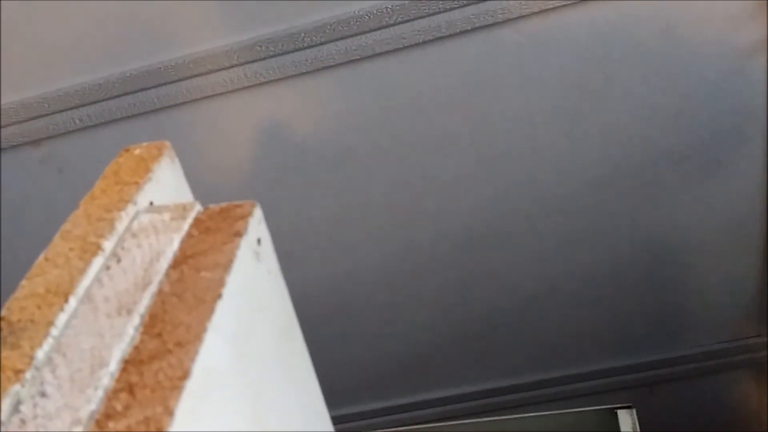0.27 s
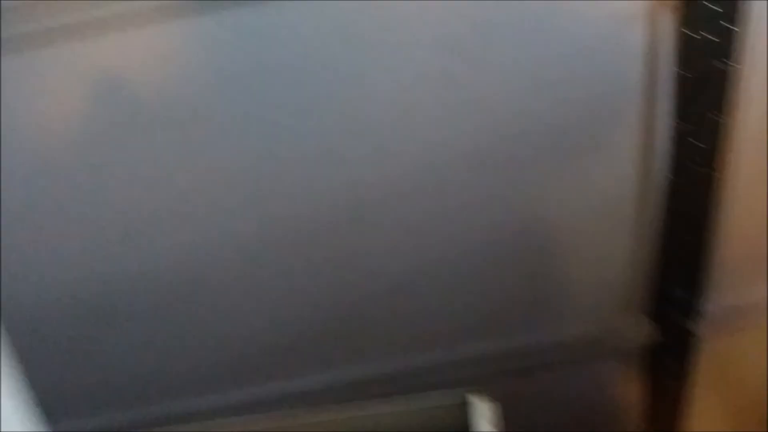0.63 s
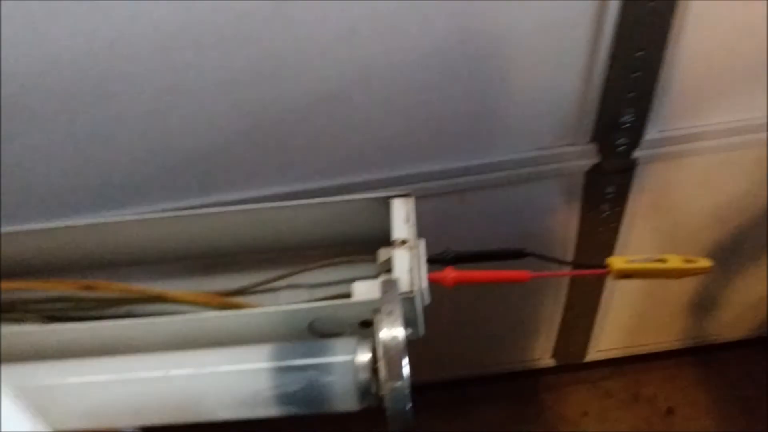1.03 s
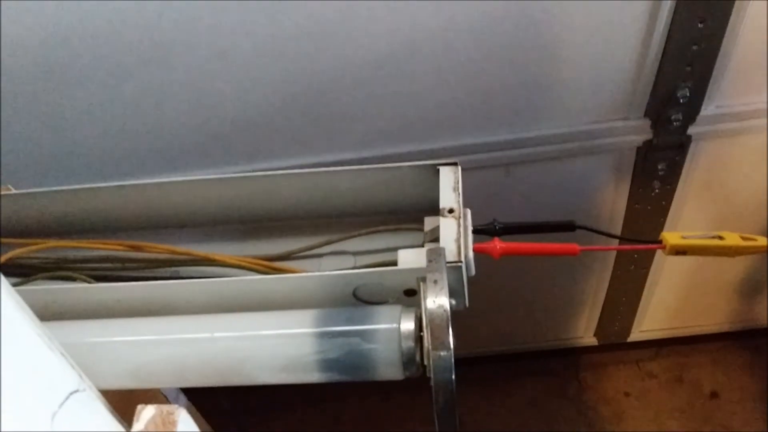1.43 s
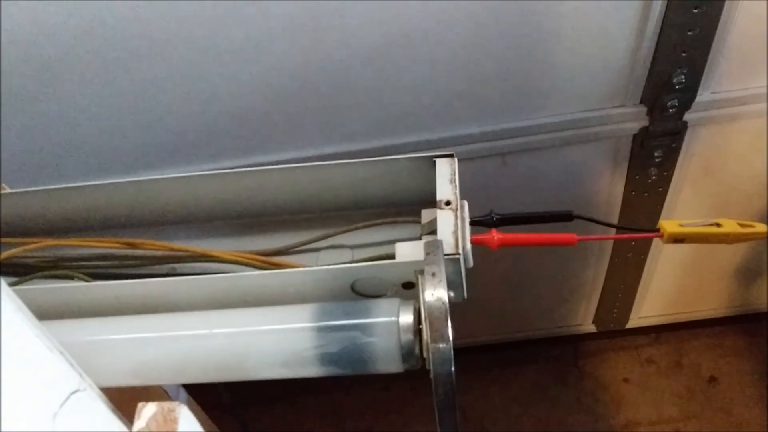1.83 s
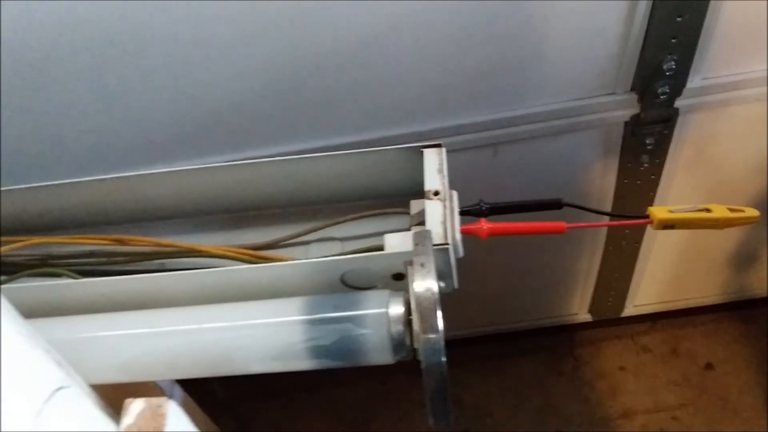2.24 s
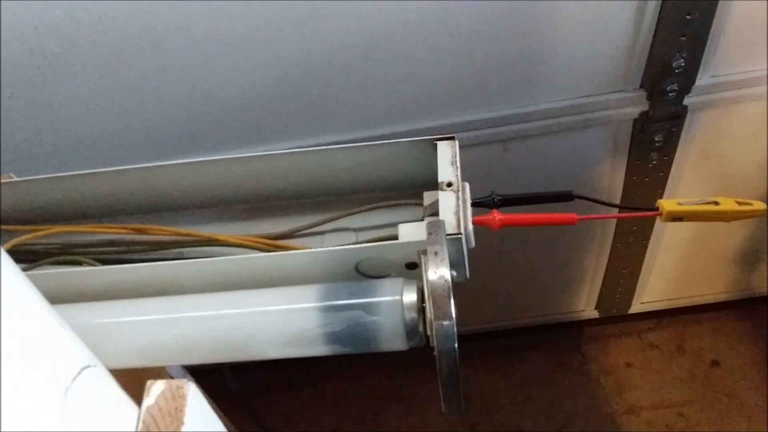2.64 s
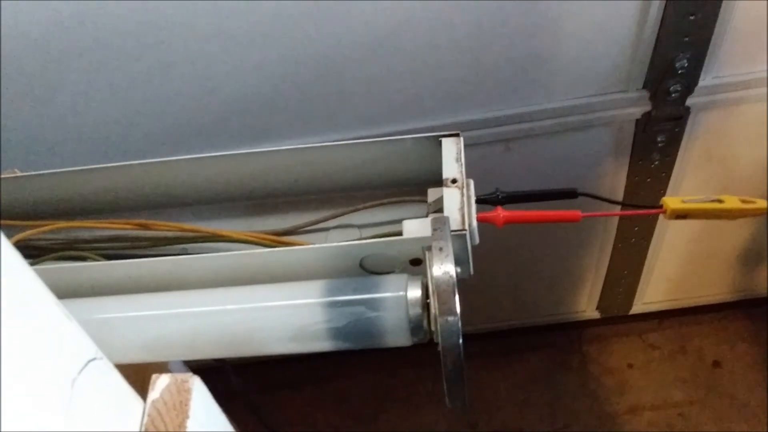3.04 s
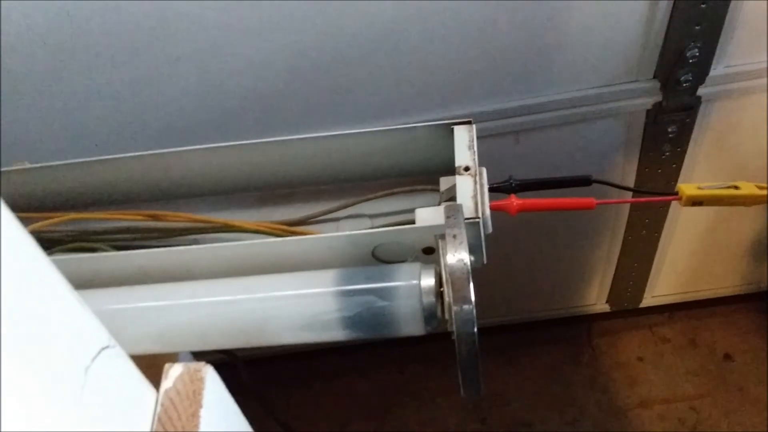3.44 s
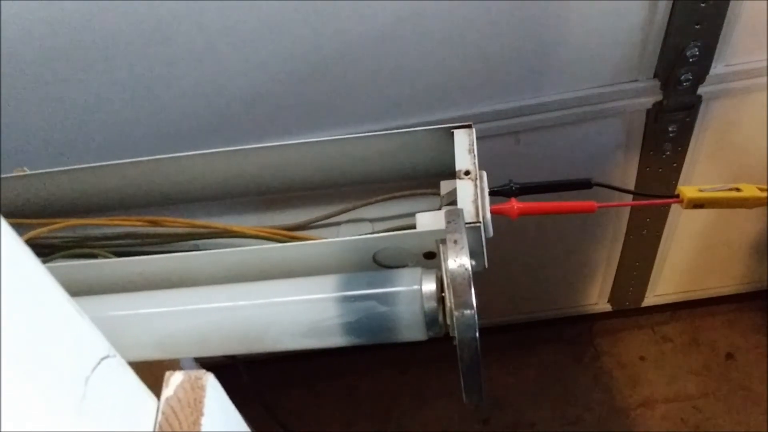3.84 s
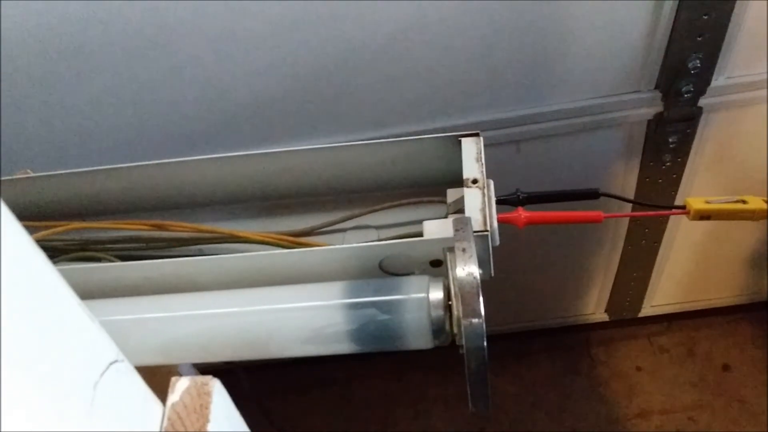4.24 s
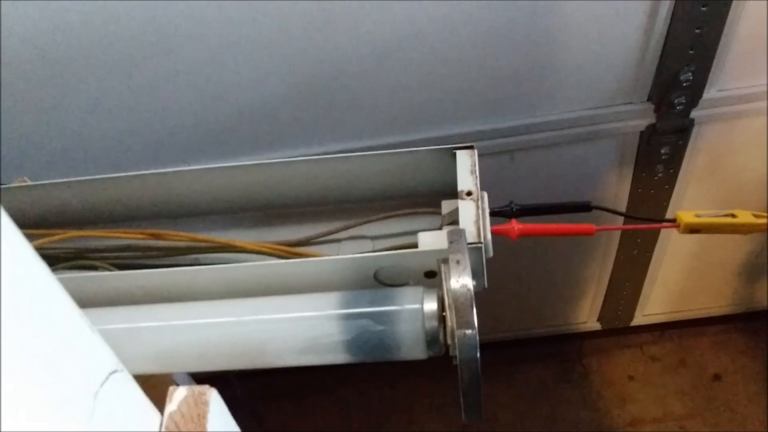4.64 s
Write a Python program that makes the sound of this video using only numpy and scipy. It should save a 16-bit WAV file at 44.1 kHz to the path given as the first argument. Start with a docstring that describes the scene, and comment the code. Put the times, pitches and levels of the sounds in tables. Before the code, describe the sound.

A fluorescent tube tries to start with uneven, high glassy tinks and dry ticks, over light handling noise and a faint hum.

```python
"""A fluorescent tube trying to start

A cold tube in a quiet garage tinks at uneven moments, each impulse ringing its glass near 9 kHz.
Between the tinks come dry ticks and the friction noise of handling: rustle, scuffs and soft bumps.
One knock excites the modes of the sheet-metal fitting. A faint hum and the room's air lie beneath."""
import sys
import numpy as np
from scipy import signal
from scipy.fft import rfft, irfft, next_fast_len
from scipy.io import wavfile
from scipy.ndimage import map_coordinates

SR = 44100
rng = np.random.default_rng(int(sys.argv[2]) if len(sys.argv) > 2 else 0)


def generate_wav(signal):
    """Clip the signal to [-1, 1] and save it as 16-bit WAV at the path in sys.argv[1]."""
    frames = np.transpose(np.atleast_2d(signal))
    scaled = np.clip(frames, -1, 1) * 32767
    pcm = np.round(scaled).astype(np.int16)
    wavfile.write(sys.argv[1], SR, pcm)


N = 215843

# brushing contacts: t/s, scuff level/dB, bump level/dB, t60/s
CONTACT_EVENTS = [(0.1118, -48, -55, 0.15), (0.7448, -41.5, -46, 0.047), (1.074, -47, -65, 0.075),
                  (1.212, -48, -68, 0.2), (1.5153, -45.5, -44.5, 0.17), (1.88, -46, -62, 0.067),
                  (2.8506, -53, -66, 0.16), (3.2143, -52.5, -61, 0.42), (3.9978, -40, -47.5, 0.065),
                  (4.0235, -40.5, -47.5, 0.072), (4.115, -44.5, -44.5, 0.063), (4.249, -56, -52, .15),
                  (4.738, -65, -50, 0.087)]
# spectrum of rustling friction: f/Hz, level/dB
FRICTION_SPECTRUM = [(240, -40), (400, -6.5), (865, -10.5), (949, -11), (1040, -9), (1250, -8),
                     (1460, -8.5), (2220, -6.5), (2670, -8), (3020, -7), (6540, -15.5), (8630, 0),
                     (10100, -10.5), (16000, -22.5)]


def tinks():
    """Free vibration: a short chink leaves one glass mode ringing over its neighbours and overtones."""
    # tinks: t/s, ring level/dB, f/Hz, t60/s, chink level/dB, upper overtone level/dB
    strikes = [(0.064, -11.5, 8820, 0.047, -17, -27), (0.2686, -26.5, 8766, 0.071, -23, -53),
               (0.9425, -34.5, 8770, 0.09, -25.5, -58), (1.084, -31, 9060, 0.07, -29.5, -69),
               (1.229, -37.5, 8870, .12, -35, -77), (1.254, -33, 8790, .024, -31, -81),
               (1.5605, -20, 8726, 0.048, -15, -62), (1.764, -23.5, 9080, .15, -24.5, -58),
               (1.929, -19, 8660, .018, -14, -60), (2.0482, -19, 8900, .045, -21, -56),
               (2.167, -34, 8890, .065, -26.5, -75), (2.3048, -26, 9080, 0.043, -31.5, -72),
               (2.416, -26.5, 8839, 0.15, -29, -60), (2.5494, -47, 8880, .05, -30, -71),
               (2.826, -46, 8690, 0.078, -36, -80), (2.8516, -29, 8688, 0.057, -24.5, -61),
               (2.8898, -37, 8839, 0.09, -28.5, -67), (3.2216, -40, 8690, 0.055, -34.5, -81),
               (3.241, -32.5, 9090, 0.033, -38, -76), (3.2647, -37, 8839, 0.097, -28.5, -72),
               (3.501, -34.5, 8877, .035, -35.5, -85), (4.111, -45, 8800, .08, -44, -56),
               (4.763, -45, 8680, 0.03, -35, -81)]
    # glass modes, from the main ring's neighbours to the top overtones: f/Hz, relative level/dB, t60/s
    near_modes = [(8060, -12, 0.034), (8910, -16.5, 0.029), (8839, -12, 0.099), (9760, -18, 0.039),
                  (10330, -31.5, 0.12), (10600, -45, 0.049)]
    mid_modes = [(10250, -19, 0.064), (11120, 1, 0.08), (11650, -2, 0.089), (11800, -5, 0.07),
                 (12900, 6, .09), (11600, -1, 0.12)]
    high_modes = [(13616, -14, .12), (13946, 0, .11)]
    top_modes = [(15360, -13, .12), (15560, -1, .14)]
    # resonances of the chink: f/Hz, width/Hz, relative level/dB
    chink_bands = [(3140, 250, -19), (5880, 3500, -25.5), (8780, 610, -1), (12600, 1400, -28)]
    near_spread, mid_spread = .012, .03  # scatter from tink to tink, as fractions of the frequency
    out, t = np.zeros(N), np.arange(SR // 4) / SR
    for s, ring_db, hz, t60, chink_db, upper_db in strikes:
        near_tuning, mid_tuning = rng.normal(1, [near_spread, mid_spread])
        main = np.sin(2 * np.pi * hz * t) * fade(t, t60)
        neighbours = ring(near_modes, t * near_tuning, scatter_db=3)
        overtones = amp(chink_db - 37) * ring(mid_modes, t * mid_tuning, scatter_db=4)
        overtones += amp(upper_db) * ring(high_modes + top_modes, t, scatter_db=3)
        burst = filtered(rng.standard_normal(len(t)),
                         lambda f: sum(amp(db) * resonance(f, c, w) ** 2 for c, w, db in chink_bands))
        burst *= fade(t, t60=.023)
        chink = amp(chink_db) * burst / np.abs(burst).max()
        add(out, s, (amp(ring_db) * (main + neighbours) + overtones + chink) * rise(t, tau_s=.0008))
    return out


def ticks():
    """Impulse response: a dry snap with a crunch and a hollow ring, then a reflection off the fitting."""
    # distinct ticks: t/s, relative level/dB, treble level/dB
    loud_ticks = [(0.4286, -31, -4.5), (0.482, -16, -9.5), (0.528, -35.5, -8), (0.736, -34.5, -7.5),
                  (0.7502, -35.5, -14), (0.825, -34, -10), (1.3479, -32.5, -7.5), (1.3781, -31.5, -9),
                  (1.4214, -34, -13), (1.4649, -26, -12.5), (1.4842, -32, -9), (1.5588, -30, -3.5),
                  (1.6937, -37.5, -7), (1.7548, -31, -7), (1.8093, -30.5, -3.5), (2.0936, -33, -4),
                  (2.1032, -26.5, -3.5), (2.1446, -32.5, -8), (2.1618, -31, -4.5), (3.817, -48, 10),
                  (4.024, -34, -15), (4.0949, -32.5, -5.5), (4.169, -27.5, -10.5), (4.478, -43.5, -12),
                  (4.7648, -40, -3.5), (4.805, -31.5, 6.5)]
    # spectrum of the snap: f/Hz, level/dB
    snap_spectrum = [(120, -58), (300, -17), (700, -13.5), (1350, -9.5), (2450, 0.5), (3100, -2),
                     (3950, -8), (4700, -5.5), (6900, -8.5), (8600, 1), (10900, -12.5), (15000, -18.5),
                     (16000, -20)]
    # modes that a tick excites: f/Hz, relative level/dB, t60/s
    body_modes = [(2370, 2, 0.014), (2600, -2, 0.015), (2560, -23, 0.0016), (3330, -4, .012)]
    out, t = np.zeros(N), np.arange(2048) / SR
    hz = np.fft.rfftfreq(len(t), 1 / SR)
    treble_shelf = np.clip((hz - 5000) / 4000, 0, 1)
    for s, db, treble_db in loud_ticks + light_ticks():
        crunch = .064 * rng.standard_normal(len(t)) * fade(t, t60=.023)
        slip = (t == 0) + crunch
        pulse = snap(along(snap_spectrum, hz) + treble_shelf * (treble_db + 6.5))
        tick = signal.fftconvolve(slip, pulse / np.linalg.norm(pulse))[:len(t)]
        tick += amp(-33) * ring(body_modes, t, scatter_db=6)
        add(out, s + .001, amp(db + 12.5) * tick)
        add(out, s + rng.uniform(.00384, .00664), amp(db) * tick)  # reflection
    return out


def light_ticks():
    """A jittered pulse train: rows of weak, dull ticks, each at a random point in its time slot."""
    # spells of ticking: start t/s, end t/s, relative level/dB
    spells = [(0.649, 0.86, -41.5), (1.324, 1.53, -40), (1.678, 1.92, -43), (2.059, 2.15, -35)]
    ticks_per_s, scatter_db, treble_db = 46, 4.5, -12
    rows = []
    for start, end, db in spells:
        slots = np.arange(start, end, 1 / ticks_per_s)
        for s, (late, size) in zip(slots, rng.random((32, 2))):
            rows.append((s + late / ticks_per_s, db + scatter_db * (2 * size - 1), treble_db))
    return rows


def knock():
    """Frequency-dependent damping: a clack loses its treble first; the sheet metal's modes follow it."""
    # blow on the fitting: t/s, relative level/dB
    blows = [(1.9283, -22)]
    # modes of the sheet metal: f/Hz, relative level/dB, t60/s
    metal_modes = [(70, -19, 0.13), (190, -13, 0.15), (225, -21, 0.15), (360, -8, 0.12), (450, -12, 0.1),
                   (480, -28, 0.089), (593, -24, 0.13), (710, -17, 0.09), (1370, -8, 0.07),
                   (1980, -11, 0.12), (3900, -11, .07)]
    # spectrum of the clack: f/Hz, level/dB
    clack_spectrum = [(21, -48), (35, -29), (195, -8.5), (634, -14.5), (702, -14), (1060, -15), (1300, -9),
                      (1720, -16.5), (2060, -10.5), (2340, -4.5), (3910, -9.5), (6690, -9), (8650, 9),
                      (10900, -12), (16000, -26)]
    # decay of the clack: f/Hz, t60/s
    clack_decay = [(80, 0.31), (400, 0.34), (1500, 0.1), (4000, 0.04), (12000, 0.035)]
    out, t = np.zeros(N), np.arange(SR // 2) / SR
    for s, db in blows:
        clack = coloured(dying_noise(clack_decay, len(t)), clack_spectrum) * rise(t, tau_s=.0019)
        clack = filtered(clack, lambda hz: bass_cut(hz, corner_hz=350))
        body = ring(metal_modes, t, scatter_db=.5) * rise(t, tau_s=.0011)
        add(out, s - .002, amp(db - 15.7) * clack)
        add(out, s + .008, amp(db - 10) * body)
    return out


def scuffs():
    """Sliding friction: each contact's grainy rub swells and dies, coloured by a hollow resonance."""
    out, t = np.zeros(N), np.arange(SR // 4) / SR
    for s, db, _, t60 in CONTACT_EVENTS:
        grit = rng.standard_normal(len(t))
        grit *= 1 + 3 * (rng.random(len(t)) < .02)  # occasional coarse grains
        grit = filtered(grit, lambda hz: 1 + .48 * resonance(hz, centre_hz=2340, width_hz=530))
        envelope = fade(t, t60) * rise(t, tau_s=.0016)
        add(out, s - .002, amp(db) * coloured(grit, FRICTION_SPECTRUM) * envelope)
    return out


def bumps():
    """Damped impact: the same contacts each give a dull burst of noise with no clear ring."""
    # spectrum of a bump: f/Hz, level/dB
    bump_spectrum = [(60, -18), (130, -2), (220, 4.5), (350, -3.5), (550, -6), (1000, -8), (2000, -18)]
    out, t = np.zeros(N), np.arange(SR // 4) / SR
    for s, _, db, t60 in CONTACT_EVENTS:
        thud = coloured(rng.standard_normal(len(t)), bump_spectrum)
        add(out, s, amp(db) * thud * fade(t, t60) * rise(t, tau_s=.0031))
    return out


def handling():
    """Friction noise: one strength drives a dull rubbing and a rustle that crackles more as it grows."""
    # strength of the handling: t/s, relative level/dB
    strength = [(0.0, -63.5), (0.09, -58.5), (0.3, -55.5), (0.56, -61.5), (1.21, -61.5), (1.37, -60),
                (1.77, -63), (1.97, -57), (2.21, -61.5), (2.4, -62.5), (2.56, -67.5), (2.75, -73.5),
                (3.27, -65), (3.51, -73), (3.89, -71.5), (4.11, -65.5), (4.75, -71.5), (4.89, -68.5)]
    # spectrum of the rubbing: f/Hz, level/dB
    rubbing_spectrum = [(21, -55), (35, -13), (112, -4), (246, -1.5), (279, 1), (440, -8), (775, -13),
                        (879, -10), (1030, -18.5), (1500, -17), (1950, -48), (3300, -120)]
    strength_db = curve(strength)
    grains_per_s = 300 * unit(amp(strength_db))
    grains = (rng.random(N) < grains_per_s / SR) * rng.standard_normal(N)
    rustle = coloured(rng.standard_normal(N) + .31 * unit(grains), FRICTION_SPECTRUM)
    hollow = unit(filtered(grains, lambda hz: resonance(hz, centre_hz=2520, width_hz=700)))
    rubbing = coloured(rng.standard_normal(N), rubbing_spectrum)
    rustle_db = strength_db + 4.5 + 1.43 * wobble(knots_per_s=30.105)
    rubbing_db = -67 + .46 * (strength_db - strength_db.mean())
    return amp(rustle_db) * (rustle + amp(-18) * hollow) + amp(rubbing_db) * rubbing


def hum():
    """Superposition of three faint, wavering tones; the deepest sinks away partway through."""
    # envelope of the upper two tones: t/s, level/dB
    envelope = [(0.0, -62), (0.87, -69), (1.95, -58.5), (2.49, -70), (3.95, -72), (4.22, -61.5),
                (4.89, -70)]
    # upper tones: f/Hz, relative level/dB, pitch waver/Hz
    tones = [(284.2, -5, 12.2), (354, -6, 22)]
    sink_start_s, sink_length_s, sink_db = 1.5, .15, 15.5
    sunk = np.clip((np.arange(N) / SR - sink_start_s) / sink_length_s, 0, 1)
    deep = amp(-74.5 - sink_db * sunk) * wavering(hz=110.3, waver_hz=2.1)
    level_db = curve(envelope)
    return deep + sum(amp(level_db + db) * wavering(hz, waver_hz) for hz, db, waver_hz in tones)


def garage(x):
    """Diffuse reverberation: each quarter second of sound is convolved with its own short random tail."""
    # reverberation time: f/Hz, t60/s
    room_decay = [(200, 0.21), (2000, 0.16), (9000, 0.16), (15000, 0.15)]
    out, block = np.zeros(N), SR // 4
    for start in range(0, N, block):
        tail = dying_noise(room_decay, size=SR // 3)
        reverberation = signal.fftconvolve(x[start:start + block], tail / np.linalg.norm(tail))
        add(out, start / SR + .003, reverberation)
    return out


def air():
    """Stationary noise: the room's low murmur and the microphone's hiss, which peaks in the treble."""
    # spectra of the murmur and the hiss: f/Hz, level/dB
    murmur_spectrum = [(18, -81), (30, -47), (123, -6), (234, -20), (274, -12), (329, -2.5), (369, -7),
                       (474, -21), (638, -14), (940, -16.5), (1080, -25), (3530, -28), (7000, -36),
                       (9100, -84), (15400, -120)]
    hiss_spectrum = [(5000, -15), (7000, -34), (7900, -26), (8650, 6), (9300, -13), (10500, -8),
                     (16000, -5.5)]
    murmur = coloured(rng.standard_normal(N), murmur_spectrum)
    hiss = coloured(rng.standard_normal(N), hiss_spectrum)
    return amp(-71) * murmur + amp(-71.5) * hiss


def ring(modes, t, scatter_db):
    """Modal superposition: damped sinusoids with random strengths and phases."""
    return sum(amp(db + scatter_db * rng.standard_normal()) * fade(t, t60)
               * np.sin(2 * np.pi * (hz * t + rng.random())) for hz, db, t60 in modes)


def snap(gain_db):
    """Minimum phase: the most compact causal pulse with this spectrum, at peak 1."""
    cepstrum = irfft(np.log(amp(gain_db)))
    half = len(cepstrum) // 2
    causal = np.r_[cepstrum[0], 2 * cepstrum[1:half], np.zeros(half)]
    pulse = irfft(np.exp(rfft(causal)))
    return pulse / np.abs(pulse).max()


def dying_noise(decay, size):
    """Frequency-dependent damping: noise in which each band dies at its own rate."""
    hz, t, bands = signal.stft(rng.standard_normal(size), SR, nperseg=256)
    damped = bands * fade(t, along(decay, hz)[:, None])
    return signal.istft(damped, SR, nperseg=256)[1][:size]


def wavering(hz, waver_hz):
    """Random frequency and amplitude modulation of a tone."""
    phase = 2 * np.pi * np.cumsum(hz + waver_hz * wobble(knots_per_s=25)) / SR
    flutter_db = 4.5 * wobble(knots_per_s=18)
    return amp(flutter_db) * np.sqrt(2) * np.sin(phase)


def wobble(knots_per_s):
    """Spline interpolation through random knots."""
    knots = rng.standard_normal(int(N * knots_per_s / SR) + 4)
    return map_coordinates(knots, [np.arange(N) * knots_per_s / SR])


def resonance(hz, centre_hz, width_hz):
    """Band-pass response of a damped oscillator."""
    return 1j * hz * width_hz / (centre_hz ** 2 - hz ** 2 + 1j * hz * width_hz)


def bass_cut(hz, corner_hz):
    """First-order high-pass response."""
    return 1j * hz / (1j * hz + corner_hz)


def filtered(x, response):
    """Linear filtering: the spectrum of x times a frequency response."""
    size = next_fast_len(len(x) + 8192)
    return irfft(rfft(x, size) * response(np.fft.rfftfreq(size, 1 / SR)), size)[:len(x)]


def coloured(x, spectrum):
    """Spectral shaping of x, at rms 1."""
    return unit(filtered(x, lambda hz: amp(along(spectrum, hz))))


def rise(t, tau_s):
    """Exponential approach to 1."""
    return 1 - np.exp(-t / tau_s)


def fade(t, t60):
    """Exponential decay, 60 dB in t60 seconds."""
    return np.exp(-np.log(1000) * t / np.maximum(t60, 1e-3))


def along(points, hz):
    """Interpolation of (f/Hz, value) points on a logarithmic frequency axis."""
    f, values = np.transpose(points)
    return np.interp(np.log(hz + 1), np.log(f + 1), values)


def curve(points):
    """Linear interpolation of (t/s, value) points at every sample."""
    s, values = np.transpose(points)
    return np.interp(np.arange(N) / SR, s, values)


def amp(db):
    """Decibels to amplitude ratio."""
    return 10 ** (np.asarray(db) / 20)


def unit(x):
    """Normalisation to rms 1."""
    return x / np.sqrt(np.mean(x ** 2) + 1e-20)


def add(track, s, sound):
    """Superposition of a sound on the track at time s."""
    start = max(round(s * SR), 0)
    track[start:start + len(sound)] += sound[:N - start]


def scene():
    """Direct and reverberant fields: the tube and the small noises near it add to the garage's tail."""
    tube, clicks, contacts = tinks(), ticks(), knock() + scuffs() + bumps()
    room = garage(amp(-12.5) * tube + amp(-9.5) * clicks + amp(-3) * contacts)
    return (tube + clicks + contacts + room + handling() + hum() + air())[None]


def record(dry):
    """Band limiting: the camera drops the deepest bass and cuts off steeply in the top treble."""
    top_hz = 15900
    thinned = filtered(dry[0], lambda hz: bass_cut(hz, corner_hz=22) ** 3)
    return filtered(thinned, lambda hz: 1 / (1 + (hz / top_hz) ** 200))[None]


dry = scene()
out = record(dry)
generate_wav(out)
```